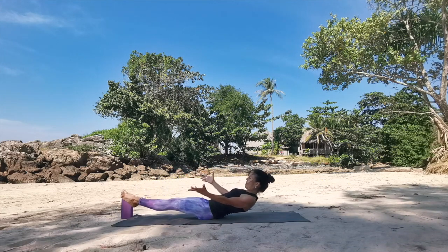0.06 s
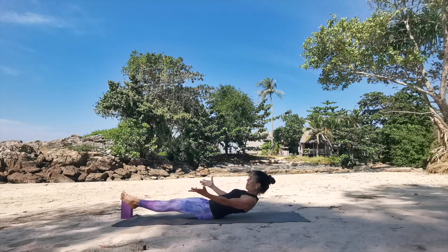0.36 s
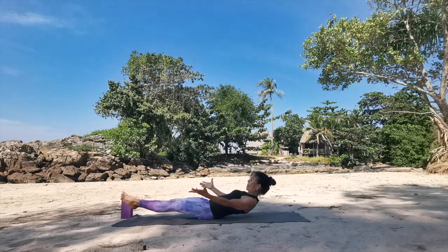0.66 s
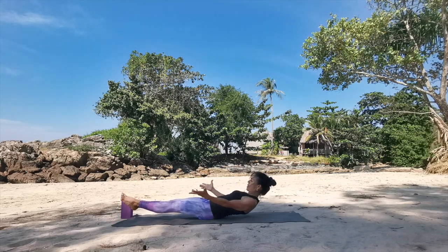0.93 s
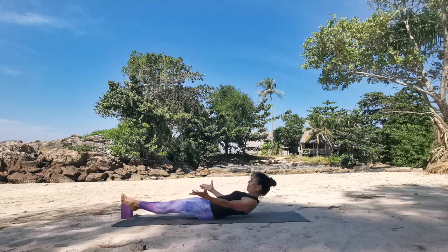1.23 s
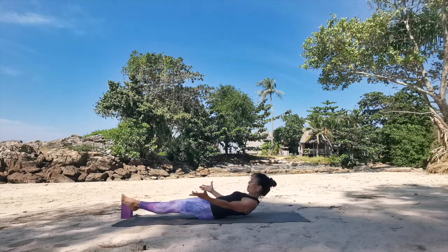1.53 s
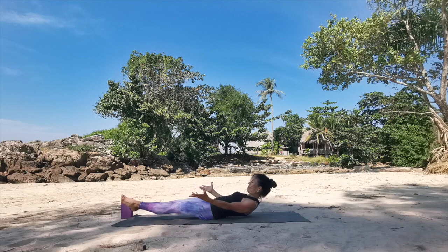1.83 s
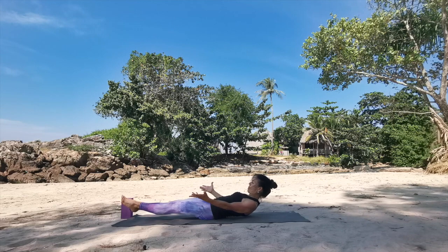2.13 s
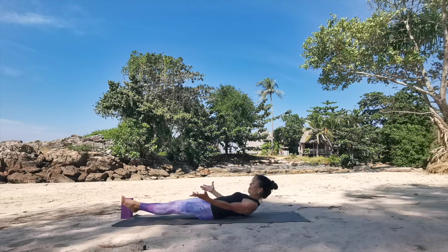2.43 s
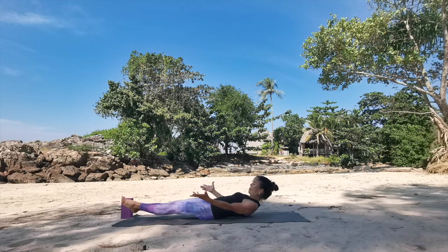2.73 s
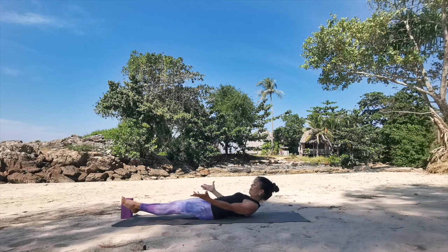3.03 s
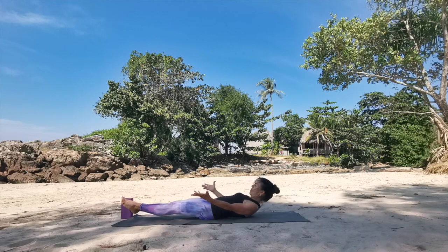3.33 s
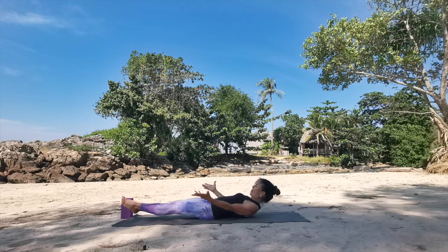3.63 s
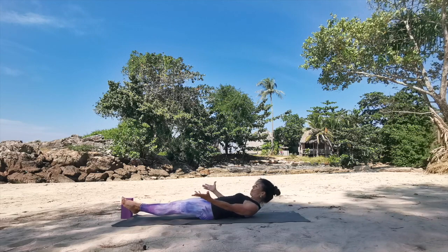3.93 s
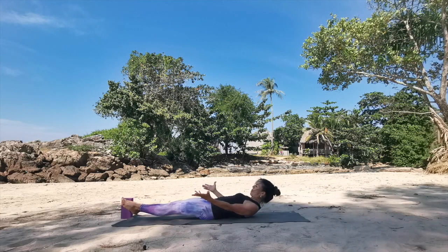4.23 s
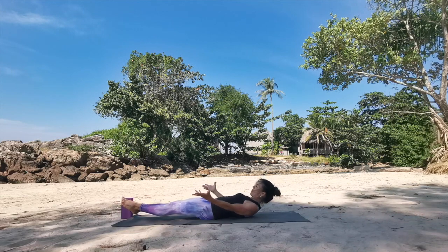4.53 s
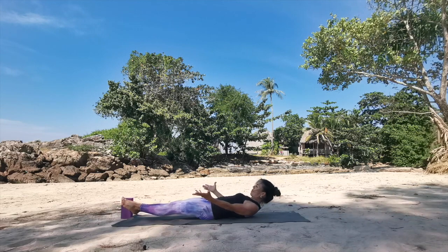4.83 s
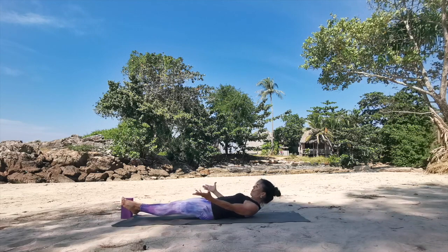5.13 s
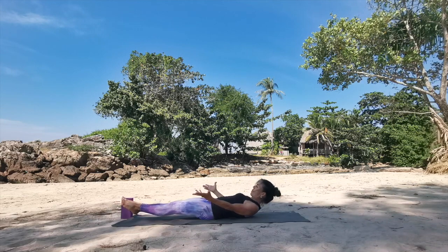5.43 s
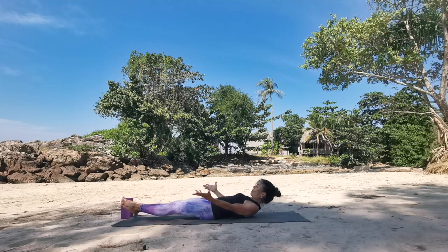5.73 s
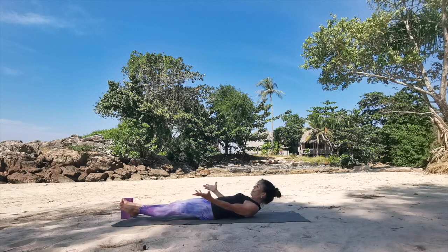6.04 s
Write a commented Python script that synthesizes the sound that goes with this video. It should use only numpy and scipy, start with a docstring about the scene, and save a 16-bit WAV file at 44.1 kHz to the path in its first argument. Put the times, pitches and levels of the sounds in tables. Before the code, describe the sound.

A bird gives four short, clear hoots over faint chirps and distant surf, then wind briefly thumps the microphone.

```python
"""A calm tropical beach backed by trees. Faint surf and leaf hiss lie below from the start. Birds whistle
deep in the wood and a small one chirps downward slurs. At one second a thin, high twitter joins in, and
another bird gives the first of four short rising hoots; the foliage scatters every call. From two seconds
a few wavelets plop, then a far boat engine hums in and draws nearer. At five seconds one puff of wind
thumps on the microphone."""
import sys
import numpy as np
from scipy import signal
from scipy.fft import rfft, irfft
from scipy.io import wavfile

SR = 44100
rng = np.random.default_rng(int(sys.argv[2]) if len(sys.argv) > 2 else 0)


def persist_wave(psi):
    """Save psi, clipped to +-1, as 16-bit WAV."""
    counts = np.round(np.clip(psi, -1, 1) * 32767).astype(np.int16)
    wavfile.write(sys.argv[1], SR, np.atleast_2d(counts).T)


N = 272097
TIME = np.arange(N) / SR


def from_db(db):
    """Turn decibels into a number to multiply a sound by."""
    return 10 ** (np.asarray(db) / 20)


def unit_power(x):
    """Scale a sound so that its average power is 1."""
    return x / np.sqrt(np.mean(x ** 2) + 1e-20)


def clock(length_s):
    """Seconds since the start of a note, at every sample."""
    return np.arange(int(length_s * SR)) / SR


def bump(t, width_s):
    """A bell-shaped curve of height 1 around t = 0."""
    return np.exp(-(t / width_s) ** 2)


def drift(turns_per_s):
    """A random wander, mostly between -1 and 1."""
    points = rng.standard_normal(4000)
    return np.interp(TIME * turns_per_s, np.arange(len(points)), points)


def coloured_noise(spectrum):
    """Noise of power 1, shaped by rows of (Hz, dB) and falling away steeply beyond their ends."""
    hz, db = np.transpose(spectrum)
    f = np.maximum(np.fft.rfftfreq(N, 1 / SR), 1)
    colour = from_db(np.interp(np.log(f), np.log(hz), db))
    edges = 1 / np.sqrt((1 + (hz[0] / f) ** 8) * (1 + (f / hz[-1]) ** 8))
    return unit_power(irfft(rfft(rng.standard_normal(N)) * edges * colour, N))


def sing(notes, shape, waver, edge_s):
    """A bird's voice: a pure, slightly trembling tone. shape() gives each note's pitch and loudness."""
    out = np.zeros(N + SR)
    tremble = 1 + waver * drift(300)
    for start, *settings in notes:
        pitch, loudness = shape(*settings)
        t, at = np.arange(len(pitch)) / SR, int(start * SR)
        pitch = pitch * tremble.take(at + np.arange(len(t)), mode="wrap")
        ramp = np.clip(np.minimum(t, t[-1] - t) / edge_s, 0, 1)
        soft_ends = np.sin(ramp * np.pi / 2) ** 2
        out[at:at + len(t)] += loudness * soft_ends * np.sin(2 * np.pi * np.cumsum(pitch) / SR)
    return out[:N]


def foliage(x, build_s, early_db, early_t60, late_db, late_t60):
    """Echoes only: short from near leaves, long from the wood. A t60 is the seconds to fade by 60 dB."""
    t = clock(1)
    echoes = np.zeros(SR)
    for level_db, t60 in [(early_db, early_t60), (late_db, late_t60)]:
        cloud = rng.standard_normal(SR) * from_db(-60 * t / t60) * (1 - bump(t, build_s))
        echoes += from_db(level_db) * unit_power(cloud) / np.sqrt(SR)
    return signal.fftconvolve(x, echoes)[:N]


def in_trees(x, direct_db, near_db, far_db):
    """A call from the treetops: part comes straight to us, part arrives as echo."""
    echoes = foliage(x, build_s=0.011, early_db=near_db, early_t60=0.15, late_db=far_db, late_t60=0.92)
    return from_db(direct_db) * x + echoes


def ring(hits, hz, t60):
    """Soft blows, given as (seconds, dB), each start a tone that dies away."""
    out, t = np.zeros(N + SR), clock(0.25)
    swing = np.sin(2 * np.pi * hz * t) * from_db(-60 * t / t60) * (1 - bump(t, 0.5 / hz))
    for start, level_db in hits:
        at = int(start * SR)
        out[at:at + len(t)] += from_db(level_db) * swing
    return out[:N]


# The tone colour of the surf. Each row: frequency in Hz, relative strength in dB.
SURF_COLOUR = [(12, -23), (20, -3.5), (48, -0.5), (102, -5.5), (180, -8), (325, -9.5), (822, -15),
               (964, -17), (1700, -21), (2500, -22.5), (3430, -30), (4500, -32), (5850, -93), (9900, -120)]
def surf(start_db=-49.8, ebb_db_per_s=0.6344):
    """Small waves wash far off: a low noise that slowly ebbs."""
    level_db = start_db - ebb_db_per_s * TIME + 0.5 * drift(10)
    return from_db(level_db) * coloured_noise(SURF_COLOUR)


# The tone colour of the leaves. Each row: frequency in Hz, relative strength in dB.
LEAF_COLOUR = [(3000, -86.5), (4400, -94), (5200, -96.5), (6000, -98), (7000, -100), (7700, -92),
               (9000, -90), (13300, -91), (14000, -101), (16000, -99.5)]
def leaves(level_db=-64.5):
    """Leaves make a steady, high hiss."""
    return from_db(level_db) * coloured_noise(LEAF_COLOUR)


def whistle(length_s, hz, level_db, droop=0.0388, fade_db=14):
    """One plain note that sinks a little in pitch as it fades."""
    progress = clock(length_s) / length_s
    return hz * (1 - droop * progress), from_db(level_db - fade_db * progress ** 2)


# Distant whistles. Each row: start in seconds, length in seconds, pitch in Hz, level in dB.
WHISTLE_NOTES = [(.21, .05, 6500, -65), (.60, 0.11, 3240, -61), (1.28, .13, 3860, -58),
                 (1.36, 0.1, 2720, -57), (1.46, 0.087, 2370, -56.5), (1.93, 0.11, 3150, -56.5),
                 (2.02, 0.16, 2620, -56.5), (2.36, 0.098, 3990, -56.5), (2.57, 0.072, 3350, -59),
                 (3.28, 0.12, 3200, -61), (3.868, 0.038, 2860, -48), (3.97, 0.11, 2425, -53)]
def far_birds():
    """Birds whistle so deep in the wood that only their echoes reach us."""
    voice = sing(WHISTLE_NOTES, whistle, waver=0.025, edge_s=0.0066)
    return foliage(voice, build_s=0.002, early_db=-4.5, early_t60=0.061, late_db=-5.5, late_t60=0.79)


def chirp(lead_s, fall_s, start_hz, knee_hz, end_hz, level_db):
    """One chirp: the pitch glides to a corner, the knee, then slides down as the note fades."""
    t = clock(lead_s + fall_s)
    bow_hz, fade_db, attack_s = 100, 3, 0.0081
    lead = np.minimum(t / lead_s, 1)
    fall = np.maximum(t - lead_s, 0) / fall_s
    glide_hz = start_hz + (knee_hz - start_hz) * lead + bow_hz * np.sin(np.pi * lead)
    pitch = glide_hz * (end_hz / knee_hz) ** fall
    throat_db = -5.5 * ((pitch - 4420) / 1270) ** 2   # the voice is loudest in the middle of its range
    fade_in = np.minimum(t / attack_s, 1)
    return pitch, fade_in * from_db(level_db + throat_db - fade_db * fall ** 2)


# Falling chirps. Each row: start, lead-in length and fall length in seconds,
# then first pitch, knee pitch and last pitch in Hz, then level in dB.
CHIRP_NOTES = [(.275, 0.065, 0.039, 5850, 5020, 3170, -53.5), (.925, 0.021, 0.082, 5850, 5840, 3250, -53),
               (1.583, 0.025, 0.065, 5400, 5670, 3220, -52), (2.053, 0.04, 0.049, 5700, 5750, 3330, -53),
               (2.700, 0.023, 0.055, 5400, 5650, 3330, -48.5),
               (3.168, 0.045, 0.0076, 4150, 5480, 4030, -51),
               (3.519, 0.029, 0.057, 4350, 4870, 3100, -54.5),
               (3.968, 0.061, 0.052, 5900, 5080, 3100, -52.5),
               (4.622, 0.022, .056, 5350, 5220, 3340, -53.5), (5.092, .040, 0.011, 4250, 5360, 4200, -50.5),
               (5.559, 0.026, 0.063, 5500, 5410, 3270, -55), (6.091, 0.019, 0.052, 5150, 5240, 3250, -54.5)]
def chirping_bird(flutter_db=3.9):
    """A small bird chirps in the trees, its notes fluttering in level."""
    voice = sing(CHIRP_NOTES, chirp, waver=0.0065, edge_s=0.0022)
    flutter = from_db(flutter_db * drift(150))
    return in_trees(voice * flutter, direct_db=-2.26, near_db=-6, far_db=-7.5)


def arch(length_s, start_hz, turn_hz, level_db, turn_share=0.54, swell_db=4.5):
    """One note that curves up or down and turns back just past halfway, where it is loudest."""
    from_turn = (clock(length_s) / length_s / turn_share - 1) ** 2
    return turn_hz + (start_hz - turn_hz) * from_turn, from_db(level_db - swell_db * from_turn)


# High notes. Each row: start and length in seconds, first pitch and turning pitch in Hz, level in dB.
TWITTER_NOTES = [(.978, .048, 7100, 6750, -57), (1.026, .062, 6800, 7820, -51.5),
                 (1.258, 0.058, 7150, 6540, -54), (1.305, .066, 6930, 7760, -50.5),
                 (1.56, 0.064, 7250, 6670, -56.5), (1.63, .065, 7100, 7770, -59),
                 (1.822, 0.067, 6100, 7020, -51), (1.95, 0.096, 6800, 7400, -57.5),
                 (2.148, 0.053, 6150, 7040, -57), (2.272, 0.066, 6730, 7450, -54.5),
                 (2.46, 0.051, 6000, 6940, -53.5), (2.615, 0.059, 6940, 7480, -59.5),
                 (2.812, 0.057, 6000, 7060, -54.5)]
def twittering_bird():
    """A thin, high twitter of arches and dips, scattered by the leaves."""
    voice = sing(TWITTER_NOTES, arch, waver=0.0118, edge_s=0.0018)
    return in_trees(voice, direct_db=-5.5, near_db=-6, far_db=-9)


def hoot(peak_s, hz, level_db, push_db):
    """One hoot scoops up as it swells, then dies away with an upward flick and one last push."""
    t = clock(0.08)
    past_peak = t - peak_s
    flick_at_s, push_at_s = 0.015, 0.021   # counted from the peak
    scoop_hz, flick_hz, rise_hz_per_s, sag_hz_per_s = 79, 48, 1500, 2700
    scoop = scoop_hz * np.exp(-t / 0.01)
    rise = rise_hz_per_s * np.minimum(past_peak, flick_at_s)
    flick = flick_hz * bump(past_peak - flick_at_s, width_s=0.0065)
    sag = sag_hz_per_s * np.maximum(past_peak - push_at_s, 0)
    swell = np.abs(np.sin(np.pi / 2 * t / peak_s)) ** 1.4
    loudness = np.where(past_peak < 0, swell, bump(past_peak, width_s=0.012))
    push = from_db(push_db) * bump(past_peak - push_at_s, width_s=0.0066)
    return hz - scoop + rise + flick - sag, from_db(level_db) * (loudness + push)


# Hoots. Each row: start in seconds, seconds to reach full voice, pitch in Hz, level in dB,
# strength of the last push in dB compared with the note.
HOOT_NOTES = [(.992, 0.038, 978, -21.4, -13.5), (2.381, .036, 964, -21, -8),
              (3.612, 0.032, 975, -21.5, -4.5), (4.778, 0.035, 976, -21, -9)]
def hooting_bird():
    """The nearest bird hoots; most of its call reaches us directly, with only a faint echo."""
    voice = sing(HOOT_NOTES, hoot, waver=0.011, edge_s=0.0016)
    return voice + foliage(voice, build_s=0.02, early_db=-15.5, early_t60=0.13, late_db=-28, late_t60=1)


# Plops of water. Each row: start in seconds, pitch in Hz, level in dB.
PLOPS = [(2.04, 237, -43), (2.07, 480, -43), (3.856, 321, -44), (3.902, 225, -46), (4.142, 270, -45)]
def wavelets():
    """Wavelets plop at the water's edge, each a brief, low tone."""
    return sum(ring([(start, level_db)], hz, t60=0.11) for start, hz, level_db in PLOPS)


# How fast the engine runs. Each row: time in seconds, turns per second.
ENGINE_TURNS = [(2.6, 28.3), (2.9, 25), (3.3, 22.5), (4.0, 22.5), (4.9, 24.6), (5.22, 27.5), (6.17, 26.4)]
# How the exhaust favours some tones. Each row: frequency in Hz, boost or cut in dB.
EXHAUST_COLOUR = [(50, -28), (68, -4), (85, 2.5), (108, 0), (120, -3), (136, -11.5), (165, -40)]
def boat(arrives_s=2.44, fade_in_s=0.12, level_db=-59, nearing_db_per_s=2.5):
    """A far engine nears. Its exhaust sounds multiples of its speed, each fading in and out over water."""
    waver, flutter_db, hum_hz, hum_db = 0.0067, 3.5, 236.5, -64.5
    speed = np.interp(TIME, *np.transpose(ENGINE_TURNS))
    phase = 2 * np.pi * np.cumsum(speed * (1 + waver * drift(15))) / SR
    exhaust = np.zeros(N)
    for multiple in range(2, 7):
        tone_db = np.interp(multiple * speed, *np.transpose(EXHAUST_COLOUR)) + flutter_db * drift(5.4)
        exhaust += from_db(tone_db) * np.sin(multiple * phase + rng.uniform(0, 2 * np.pi))
    hum_loudness = from_db(hum_db + flutter_db * drift(8))   # a faint hum comes in with the boat
    hum_pitch = hum_hz * (1 + waver * drift(15))
    hum = hum_loudness * np.sin(2 * np.pi * np.cumsum(hum_pitch) / SR)
    since = TIME - arrives_s
    in_earshot = (1 + np.tanh(since / fade_in_s)) / 2
    return in_earshot * (from_db(level_db + nearing_db_per_s * since) * exhaust + hum)


# The gusts in one puff of wind. Each row: start in seconds, seconds at full strength, level in dB.
GUSTS = [(4.994, 0.061, -35), (5.095, 0.024, -45.5), (5.202, 0.034, -51.5)]
# The tone colour of the wind. Each row: frequency in Hz, relative strength in dB.
WIND_COLOUR = [(18, -14), (32, 12.5), (70, -9), (160, 4.5), (290, -6.5), (350, -15.5), (510, -14),
               (578, -3), (640, -22), (720, -9), (830, -18.5), (1000, -17.5), (1250, -22.5), (2300, -31)]
def wind_puff(attack_s=0.012, decay_db_per_s=236):
    """Swirling air rumbles on the microphone; each gust rises, holds and dies away."""
    force = np.zeros(N)
    for start, hold_s, level_db in GUSTS:
        rise = np.clip((TIME - start) / attack_s, 0, 1)
        dying_s = np.maximum(TIME - start - attack_s - hold_s, 0)
        force += rise * from_db(level_db - decay_db_per_s * dying_s)
    return force * coloured_noise(WIND_COLOUR)


# Jolts from the wind. Each row: start in seconds, level in dB.
WIND_JOLTS = [(5.003, -27), (5.028, -27), (5.052, -28), (5.174, -38)]
# How the microphone's case rings. Each row: pitch in Hz, boost in dB, seconds to fade by 60 dB.
CASE_TONES = [(42, 4, 0.091), (102, 3.5, 0.05), (170, 12.5, 0.025)]
def microphone_thumps():
    """The biggest swirls of the puff jolt the microphone and shake its case."""
    return sum(from_db(db) * ring(WIND_JOLTS, hz, t60) for hz, db, t60 in CASE_TONES)


def scene():
    """Birds, shore, boat and wind add up at one microphone."""
    birds = hooting_bird() + chirping_bird() + twittering_bird() + far_birds()
    shore = surf() + leaves() + wavelets()
    return (birds + shore + boat() + wind_puff() + microphone_thumps())[None]


def record(dry):
    """The very highest treble is cut off steeply."""
    cutoff_hz = 15720
    return signal.sosfilt(signal.ellip(12, 0.1, 80, cutoff_hz, fs=SR, output="sos"), dry)


dry = scene()
out = record(dry)
persist_wave(out)
```